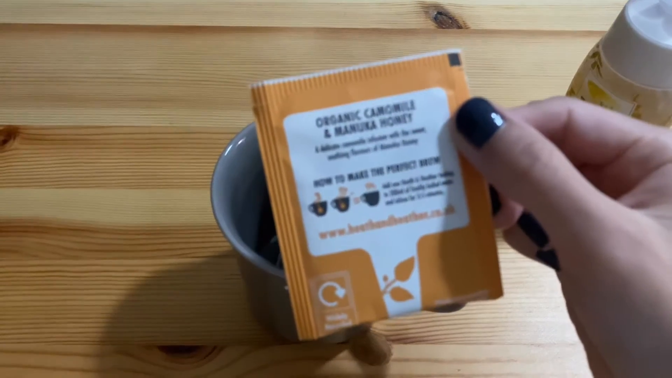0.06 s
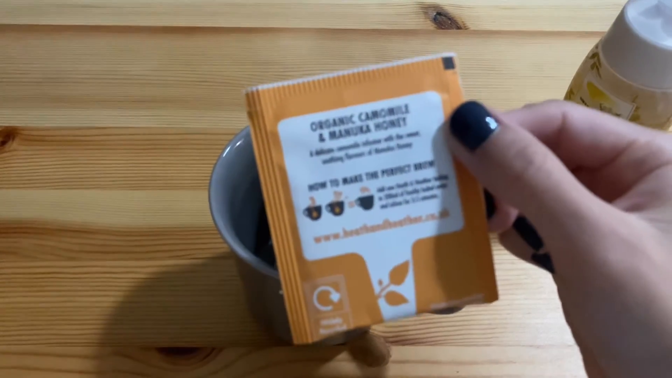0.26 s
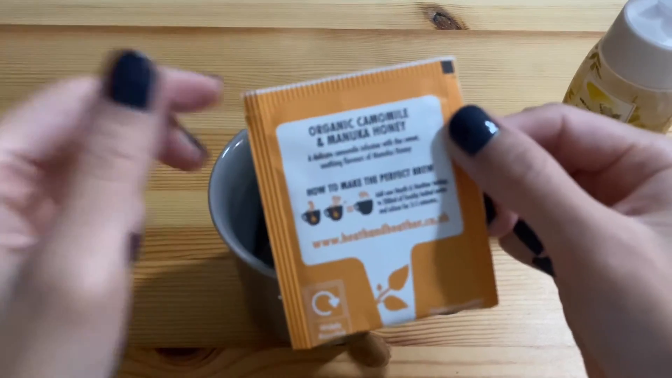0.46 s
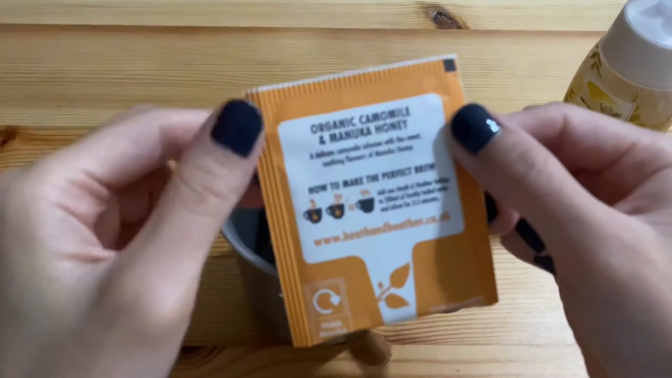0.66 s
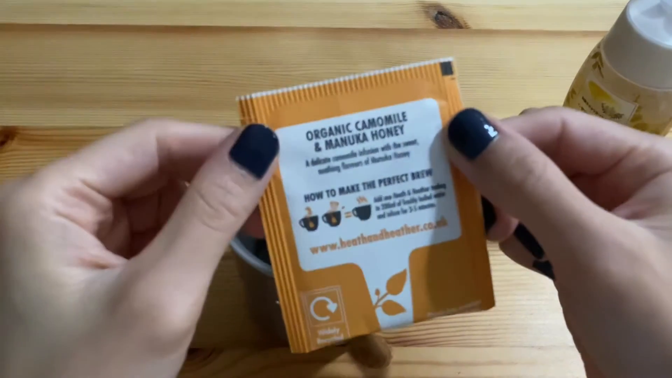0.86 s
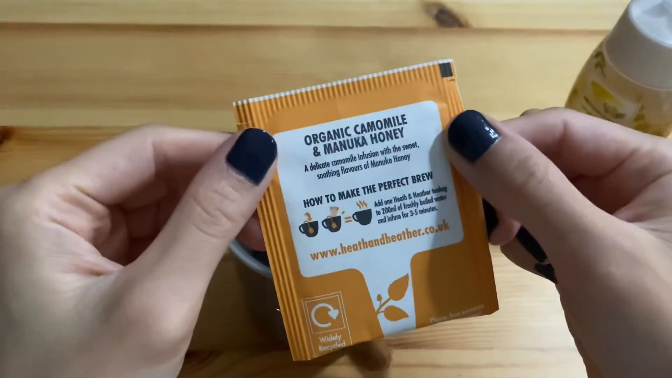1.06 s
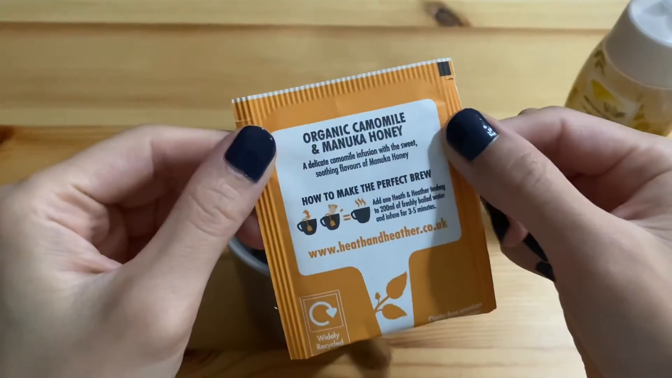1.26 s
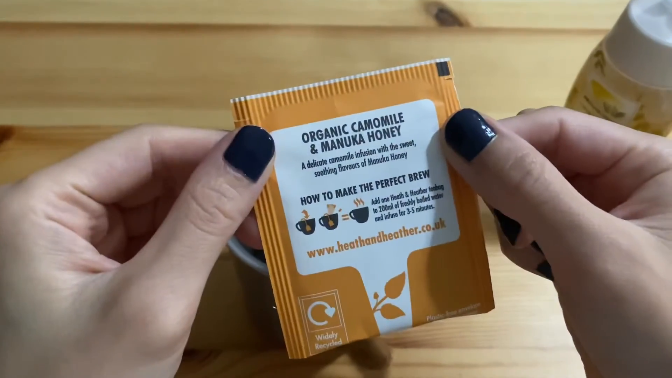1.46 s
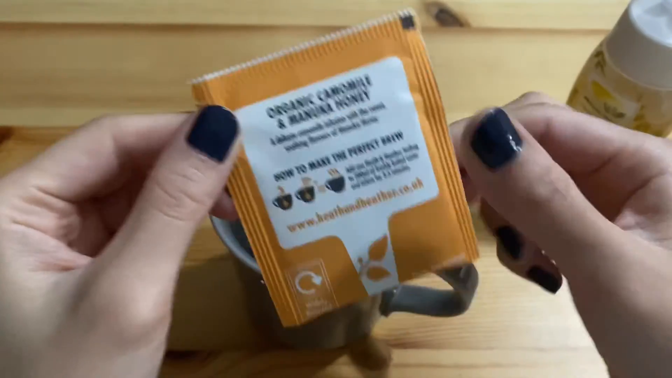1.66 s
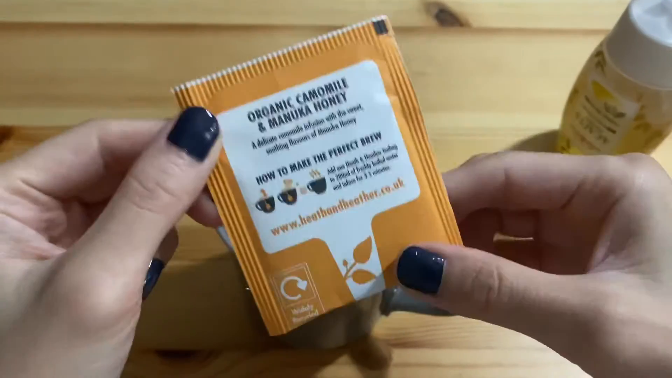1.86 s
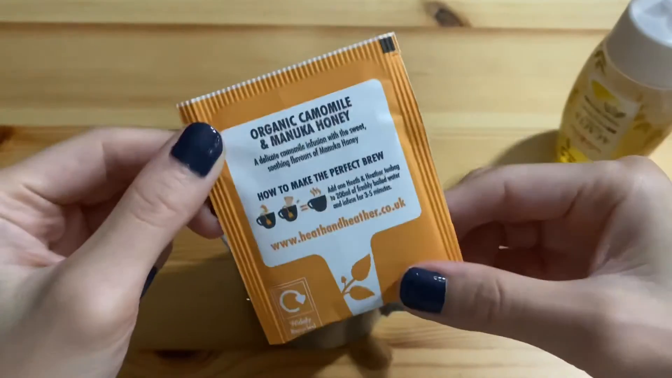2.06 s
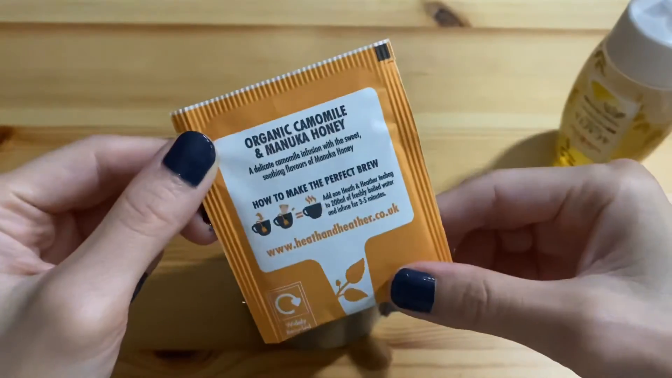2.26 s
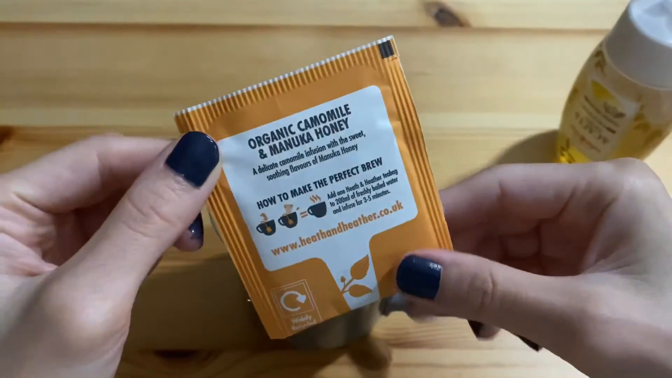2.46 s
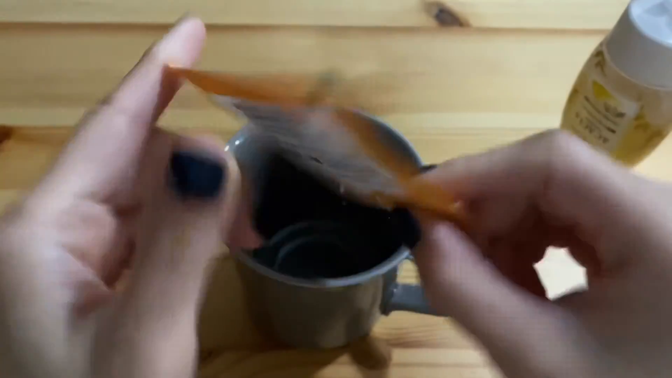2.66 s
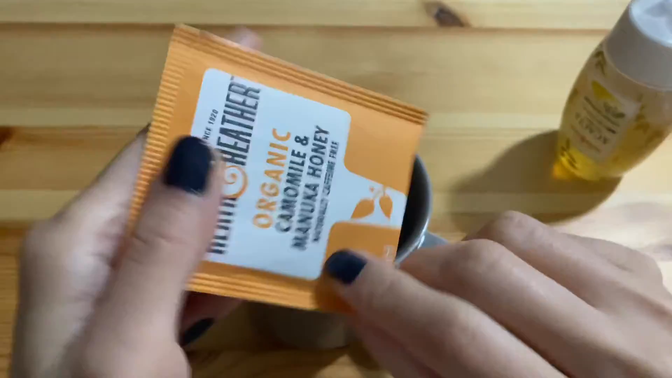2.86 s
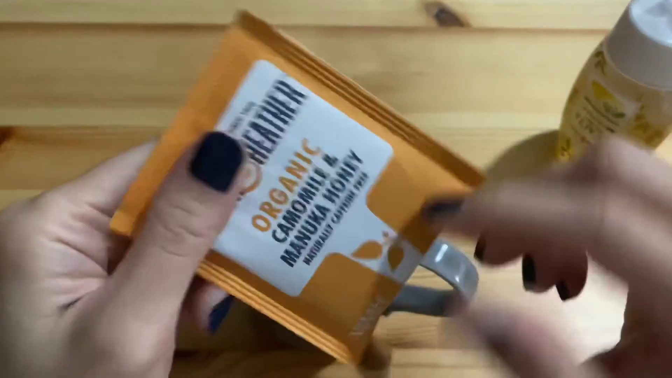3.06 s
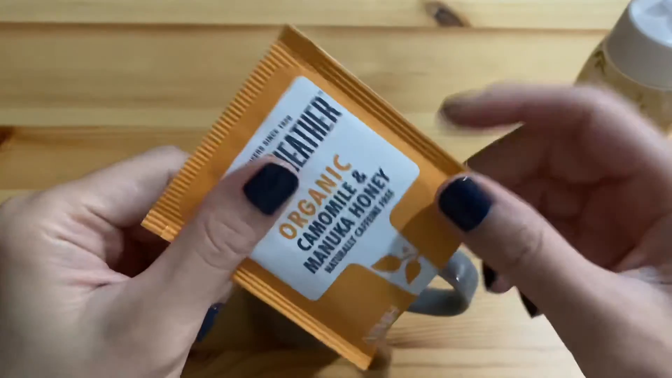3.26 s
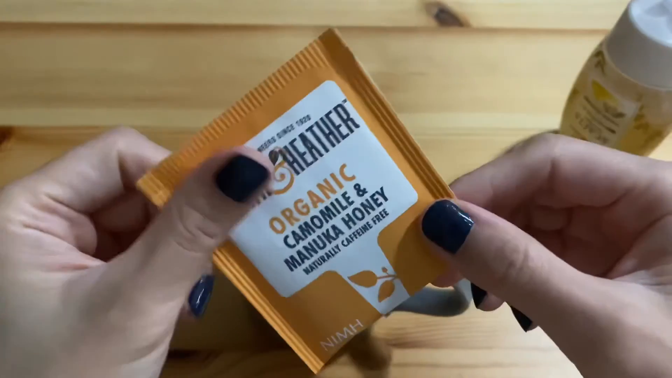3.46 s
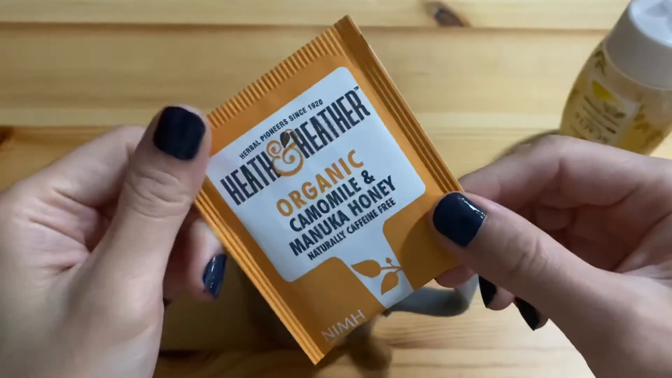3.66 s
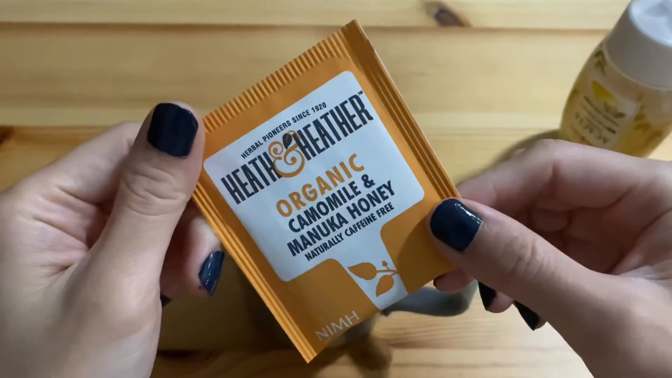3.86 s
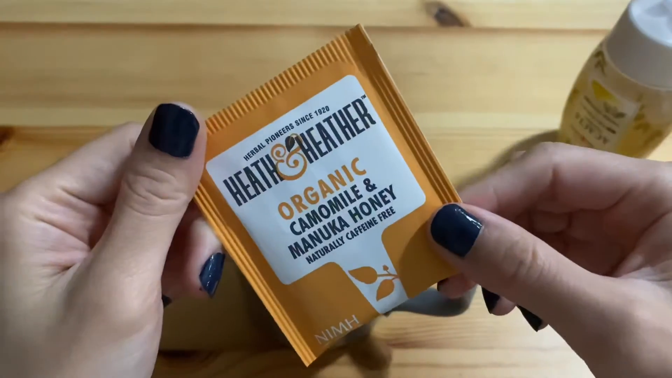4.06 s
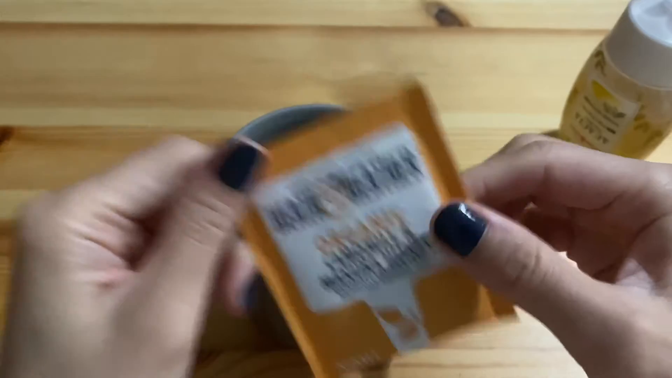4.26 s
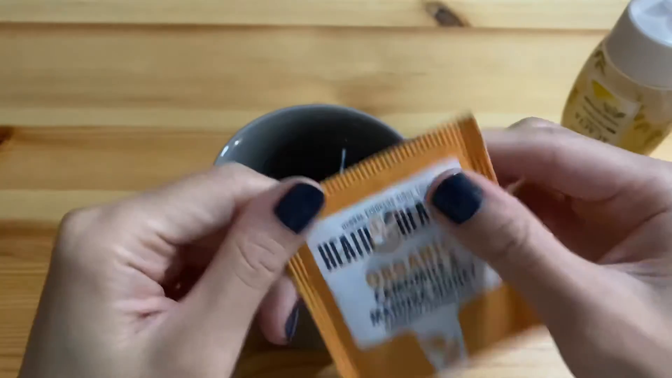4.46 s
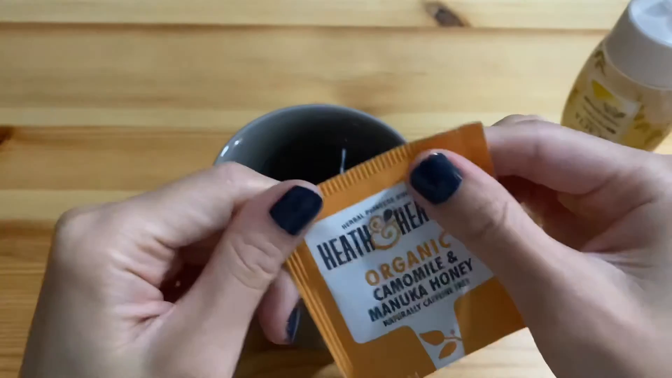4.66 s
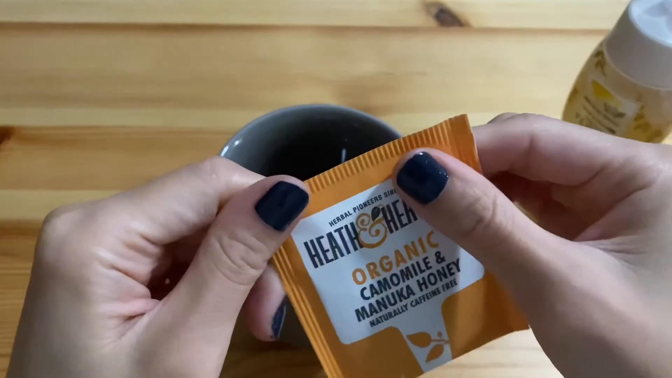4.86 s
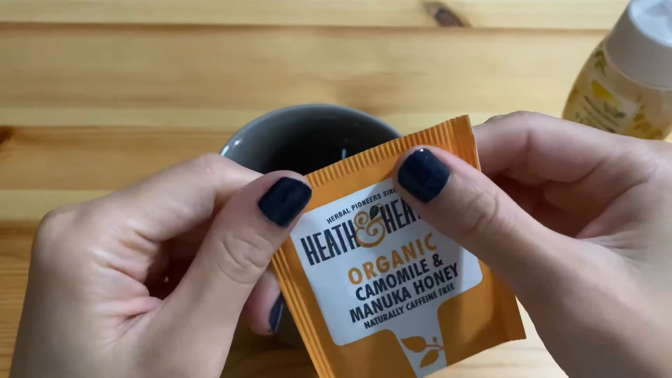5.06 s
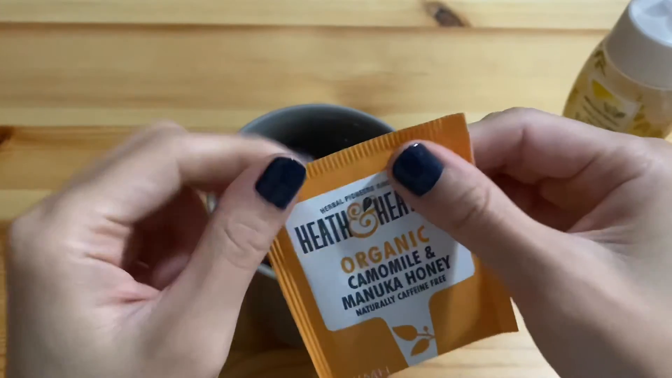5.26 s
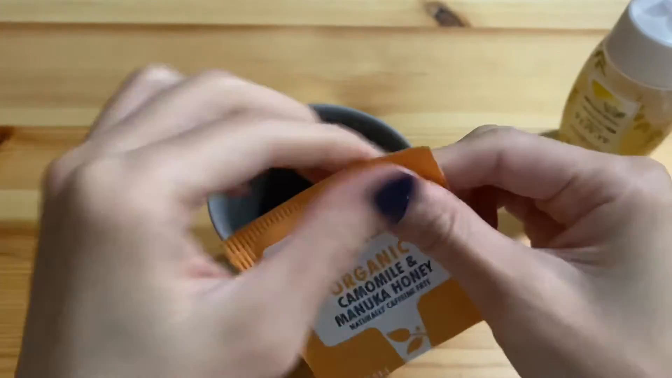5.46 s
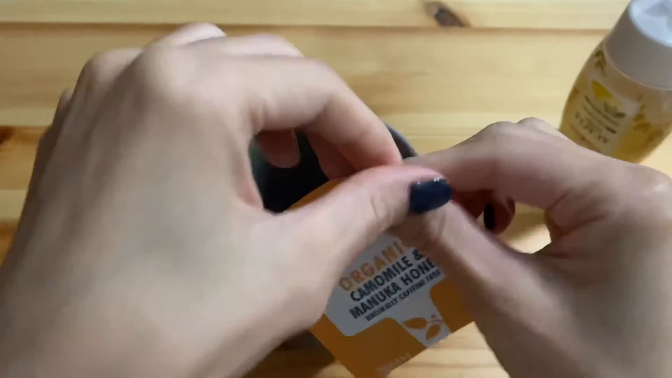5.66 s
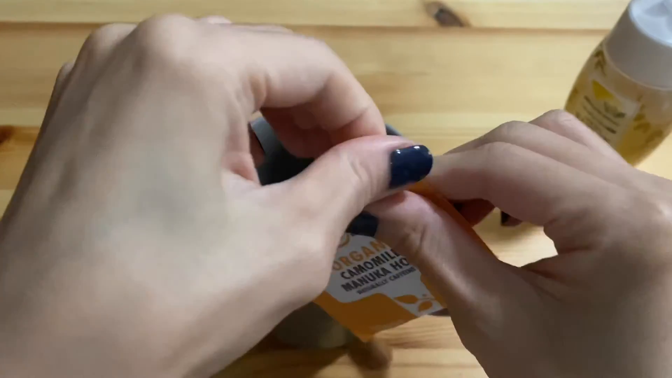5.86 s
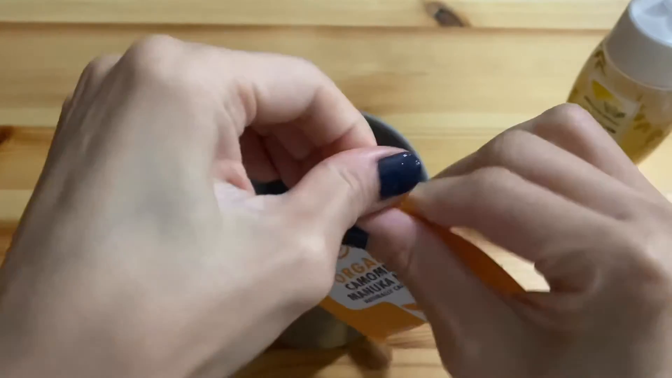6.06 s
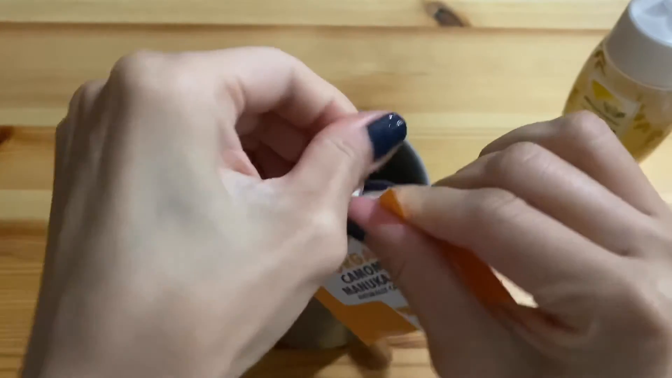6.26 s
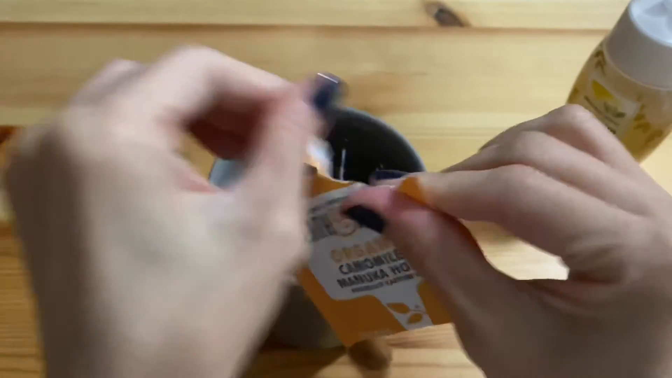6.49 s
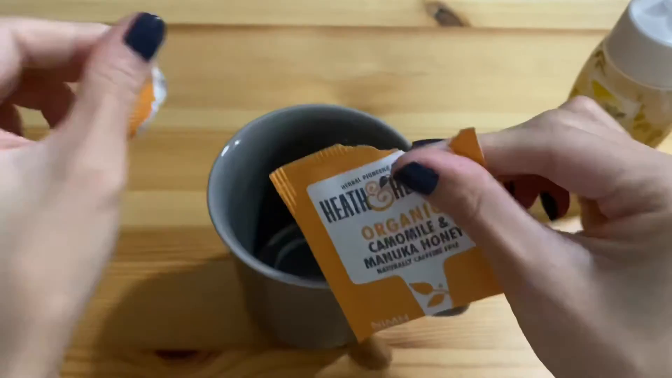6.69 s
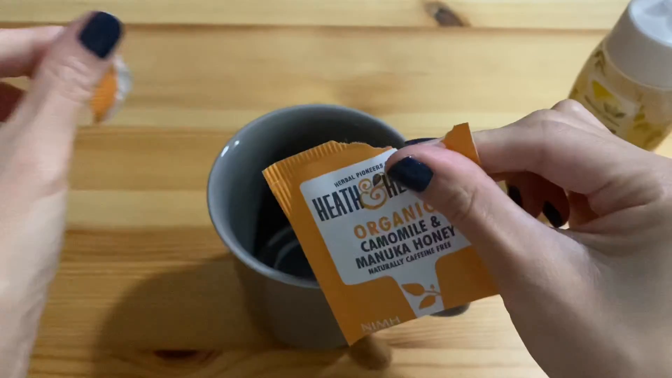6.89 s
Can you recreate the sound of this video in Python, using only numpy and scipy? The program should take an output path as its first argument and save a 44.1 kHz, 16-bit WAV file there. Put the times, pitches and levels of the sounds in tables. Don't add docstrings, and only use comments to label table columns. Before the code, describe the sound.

Close papery snaps, skin rubs and dull table knocks, then a crisp two-part tear of a small sachet over a soft appliance drone.

```python
import sys
import numpy as np
from scipy import signal
from scipy.fft import rfft, irfft, next_fast_len
from scipy.io import wavfile
from scipy.ndimage import uniform_filter1d, map_coordinates

SR = 44100
rng = np.random.default_rng(int(sys.argv[2]) if len(sys.argv) > 2 else 0)


def to_linear_factor(level_db):
    exponent = np.asarray(level_db, float) / 20
    return 10 ** exponent


def store_pcm(level_fs):
    pcm = np.round(np.clip(level_fs, -1, 1) * 32767).astype(np.int16)
    wavfile.write(sys.argv[1], SR, np.atleast_2d(pcm).T)


N = 305613

# frequency in Hz, level in dB.
AIR_SPECTRUM = [(12, -56), (22, -25), (55, 5.5), (104, -5.5), (125, -13.5), (160, -3), (206, -13),
                (340, -18.5), (615, -27.5), (970, -31.5), (1300, -39.5), (2100, -38), (2900, -43.5),
                (13300, -54.5)]
# frequency in Hz, width in Hz, level in dB.
FAN_BANDS = [(104.6, 7.6, 5), (161, 60, 3.5), (483, 13, 7), (611, 7.4, 14.5), (1570, 230, 8.5),
             (2490, 200, 12.5)]
HUM_DB, HUM_SWAY_DB, HUM_SWAYS_PER_S = -56.5, 0.5, 3

# start in seconds, peak in dB, hardness in Hz.
TABLE_BUMPS = [(.412, -60, 300), (.491, -48, 300), (.583, -56, 300), (1.447, -68, 300), (2.569, -47, 600),
               (3.016, -31, 603), (3.052, -32, 396), (3.15, -30, 510), (3.17, -32, 604),
               (3.198, -40.5, 604), (3.302, -37.5, 600), (3.934, -56.5, 305), (4.32, -38, 406.5),
               (6.779, -32, 171), (6.864, -56.5, 125.6), (6.9, -59, 130)]
# frequency in Hz, width in Hz, level in dB.
TABLE_MODES = [(60, 12, 2.5), (116, 160, -3.5), (196, 120, -2.5), (422.3, 240, -8)]

# start in seconds, length in ms,
# fade t60 in ms, hiss in dB, body in dB.
SLIDE_RUNS = [(.635, 39, 1000, -82.5, -81.5), (.765, 25, 37, -77, -71), (1.535, 45, 260, -65, -72),
              (1.575, 68, 120, -68, -72.5), (1.795, 20, 190, -75.5, -78), (1.815, 39, 160, -80, -69),
              (2.322, 25, 200, -83, -79), (2.375, 106, 460, -67.5, -70.5), (2.46, 48, 66, -58.5, -80),
              (2.535, 22, 16, -57.5, -68), (2.575, 20, 100, -63, -64.5), (2.61, 20, 200, -65, -70),
              (2.705, 34, 5600, -57, -56.5), (2.86, 40, 200, -53, -58), (2.925, 40, 400, -49, -56),
              (2.99, 65, 350, -50, -56), (3.085, 72, 80, -54.5, -56), (3.195, 6.5, 13, -61, -56.5),
              (3.21, 86, 610, -65, -71), (3.27, 61, 970, -63, -65), (3.33, 225, 240, -60, -65),
              (3.615, 43, 320, -65.5, -67),
              (4.117, 22, 770, -70.5, -72), (4.156, 50, 68, -56.5, -65.5), (4.294, 21, 150, -64, -68),
                 (4.35, 45, 180, -79, -72.5), (4.406, 3, 290, -49.5, -60), (4.505, 19, 82, -94, -68),
                 (4.64, 55, 210, -66.5, -72), (4.986, 9.4, 185, -68.5, -63.5), (5.163, 45, 150, -60, -68.5),
                 (5.244, 39, 500, -61.5, -70.5), (5.42, 5, 580, -60, -67), (5.51, 36, 23, -58, -94),
                 (5.596, 62, 340, -65, -78), (5.775, 58, 240, -65, -77), (5.807, 9.2, 160, -77, -65.5),
                 (5.92, 150, 220, -76.5, -79)]
# frequency in Hz, level in dB.
SLIDE_HISS = [(2500, -50), (3800, 0.5), (5200, 4.5), (7200, 3), (11000, 0.5), (15000, -1.5), (16600, -14)]
# frequency in Hz, level in dB.
SLIDE_BODY = [(150, -3.5), (400, -0.5), (900, -6.5), (1500, -2.5), (2600, 1.5), (3600, -2), (5000, -20)]

# start in seconds, peak in dB, panel in Hz, low push in dB re peak.
CREASE_SNAPS = [(.779, -59, 2200, -3), (.797, -65, 6700, -3), (.827, -64, 3770, -9), (1.803, -54, 2900, -5),
                (1.949, -66, 1470, -18), (2.507, -42, 4900, -39), (2.615, -52, 3750, -8.5),
                (2.75, -39, 2490, -8), (2.825, -54, 2410, 0), (2.871, -43, 1200, -2),
                (2.877, -40, 4230, -8), (2.892, -23, 5170, -15), (3.014, -44, 7380, -4),
                (3.065, -22.5, 2720, -25), (3.171, -39, 1230, -5), (3.198, -47, 1610, -7),
                (3.037, -24, 4960, -27), (3.302, -40.5, 6900, -4.5), (3.488, -27, 1970, -15.5),
                (4.307, -50, 1610, -18.5), (4.401, -22, 5000, -17), (4.989, -37.5, 1345, -16.5),
                (5.348, -39.5, 2470, -12), (5.418, -11.5, 5650, -39), (5.817, -51.5, 7500, -11),
                (5.935, -60, 7300, -29)]
# start in seconds, peak in dB, panel in Hz, low push in dB re peak.
FOLD_SNAPS = [(.827, -46.5, 1600, -17), (2.569, -50.5, 2530, -6), (2.733, -29.5, 2580, -20),
              (2.834, -25.5, 2800, -9), (2.931, -21, 2900, -13), (3.147, -34, 5920, -20),
              (4.2, -31.5, 2010, -26.5), (4.402, -21, 5530, -41.5), (4.266, -55, 2400, -16),
              (4.317, -50.5, 1640, -9), (4.364, -51, 2300, -7.5), (4.491, -56.5, 2000, -5),
              (5.419, -33.5, 2700, -33.5), (5.667, -39.5, 2430, -12.5)]
# start in seconds, peak in dB, panel in Hz, low push in dB re peak.
PANEL_POPS = [(.809, -51, 1790, -6), (1.003, -44, 1750, -14), (1.003, -41, 800, -42),
              (1.836, -40.5, 2020, -13), (1.836, -46.5, 770, -35), (3.503, -47, 1700, -12),
              (4.402, -38, 1170, -22), (5.419, -36, 1010, -30.5), (5.419, -35, 640, -34.5),
              (6.12, -37, 1640, -25.5), (6.142, -37.5, 860, -27), (4.401, -18, 2480, -40),
              (3.15, -38, 650, -20), (3.037, -30, 2800, -30), (3.488, -36, 1350, -20),
              (3.488, -29, 3200, -30), (5.667, -44, 1650, -20), (6.058, -36, 2200, -20),
              (6.465, -27, 5500, -40), (4.245, -56, 1440, -0.5), (4.522, -32, 1850, -13),
              (5.555, -56, 1700, -2.5)]
# start in seconds, peak in dB, panel in Hz, low push in dB re peak.
SEAL_BREAKS = [(6.058, -29, 6000, -16.5), (6.111, -39.5, 2030, -27), (6.139, -42, 7600, 0),
               (6.154, -46.5, 2120, -13), (6.254, -46.5, 3000, -13), (6.303, -40.5, 1600, -26.5),
               (6.32, -47.5, 2200, -17), (6.431, -43.5, 2400, -15.5), (6.141, -23, 12000, -40),
               (6.147, -27, 14500, -40), (6.155, -24, 14000, -40), (6.171, -24, 12500, -40),
               (6.182, -34, 7220, -25), (6.451, -28.5, 5560, -28), (6.463, -18.5, 5750, -28),
               (6.497, -26.5, 6360, -11), (6.504, -17.5, 6510, -16), (6.55, -27, 1510, -17)]
# start in seconds, peak in dB.
FIBRE_TICKS = [(6.09, -50), (6.169, -41), (6.232, -43), (6.266, -47), (6.299, -34), (6.333, -50.5),
               (6.377, -38.5), (6.395, -40.5), (6.241, -34), (6.253, -32), (6.291, -41), (6.319, -37.5),
               (6.36, -36), (6.37, -31), (6.406, -35), (6.417, -33), (6.431, -30.5)]
TICK_HZ, TICK_LOW_DB = 7300, -47.5

# middle in seconds, slips per second, level in dB, half length in ms.
THUMB_SKIDS = [
    (0.798, 616, -48.5, 4.6),
    (0.832, 960, -63, 3),
    (0.846, 856, -65.5, 5.5),
]
SKID_DB_PER_MS = 4.5

# start in seconds, length in ms, fade t60 in ms, hiss in dB, body in dB.
RIP_RUNS = [(6.06, 11, 1100, -59, -60), (6.108, 5.4, 42, -44.5, -52.5), (6.118, 6.7, 52, -42, -47.5),
            (6.132, 23, 30, -34, -44), (6.151, 8, 74, -42, -49), (6.166, 16, 164, -40, -51),
            (6.197, 40, 74, -48, -59), (6.238, 4.4, 37, -47.5, -58), (6.251, 5, 130, -58, -62),
            (6.28, 14, 54, -54, -59), (6.296, 9, 46, -43, -53), (6.316, 6, 250, -54, -64),
            (6.355, 33, 550, -45, -53.5), (6.447, 9, 130, -32.5, -43), (6.458, 30.7, 203, -25, -34.5),
            (6.49, 65.6, 27, -31.5, -38.5)]
# frequency in Hz, level in dB.
RIP_HISS_SPECTRUM = [(2500, -40), (4000, 0), (5500, 3.5), (7300, 7), (11300, 7), (15000, 10), (16600, -31)]
# frequency in Hz, level in dB.
RIP_BODY_SPECTRUM = [(100, -3), (250, -3), (480, -6), (700, -12), (1150, -8), (1700, 1), (2600, 2.5),
                     (3600, -2), (5000, -42)]

# frequency in Hz, width in Hz, level in dB.
MUG_AIR_MODES = [(865, 40, 0)]
# frequency in Hz, width in Hz, level in dB.
MUG_WALL_MODES = [(1938, 5, -5), (2110, 4, -1)]
# frequency in Hz, width in Hz, level in dB.
POUCH_MODES = [(457, 70, -6.5), (1600, 210, 3.5), (1856, 90, -7), (2616, 160, -3), (3630, 270, -9.5),
               (5450, 570, 2), (6520, 396, -9.5), (7460, 500, 0)]
# frequency in Hz, t60 in seconds.
ROOM_T60 = [(200, 0.69), (1000, 0.2), (3000, 0.28), (8000, 0.14), (15000, 0.17)]

# frequency in Hz, likeness from 0 to 1.
NEAR_LIKENESS = [(100, .96), (450, .93), (900, .9), (2000, .8), (3500, .6), (6000, .8)]
# frequency in Hz, likeness from 0 to 1.
FAR_LIKENESS = [(60, 0.96), (200, 0.8), (500, 0.085), (2000, 0.09), (6000, 0.39)]
# frequency in Hz, level in dB.
NEAR_RIGHT_DB = [(60, -3.5), (250, -6.5), (1000, -10), (2500, -4), (4500, -6.5), (6500, -7)]
# frequency in Hz, level in dB.
FAR_RIGHT_LEVEL_DB = [(60, -1.8), (200, -3.5), (800, 1), (2500, -4.5), (6500, -0.5)]
# frequency in Hz, phase in rad.
RIGHT_PHASE_RAD = [(100, 0), (1000, -.7), (2300, -1.5), (3200, -1), (3900, .1), (6500, 0)]


def unit(x):
    return x / np.sqrt(np.mean(x ** 2) + 1e-20)


def along(points, hz):
    f, v = np.transpose(points)
    return np.interp(np.log(hz + 1), np.log(f + 1), v)


def wobble(knots_per_s):
    knots = rng.standard_normal(int(N * knots_per_s / SR) + 4)
    return map_coordinates(knots, [np.arange(N) * knots_per_s / SR])


def filtered(x, response):
    m = next_fast_len(x.shape[-1] + SR // 2)
    return irfft(rfft(x, m) * response(np.fft.rfftfreq(m, 1 / SR)), m)[..., :x.shape[-1]]


def coloured(x, spectrum):
    return unit(filtered(x, lambda f: to_linear_factor(along(spectrum, f))))


def mode(f, hz, width_hz):
    return 1j * f * width_hz / (hz * hz - f * f + 1j * f * width_hz)


def modes(table):
    return lambda f: sum((-1) ** k * to_linear_factor(db) * mode(f, hz, width_hz)
                         for k, (hz, width_hz, db) in enumerate(table))


def patchy(grain, patchy_db):
    z = signal.stft(grain * rng.standard_normal((2, N)), nperseg=256)[2]
    field = uniform_filter1d(rng.standard_normal(z.shape[1:]), size=5, axis=0)
    field = uniform_filter1d(field, size=8, axis=1)
    return signal.istft(z * to_linear_factor(patchy_db * unit(field)), nperseg=256)[1][:, :N]


def background():
    def bands(f):
        fans_db = sum(db * np.exp(-((f - hz) / width_hz) ** 2) for hz, width_hz, db in FAN_BANDS)
        return to_linear_factor(along(AIR_SPECTRUM, f) + fans_db) * (f < 13400)

    air = unit(filtered(patchy(1, patchy_db=1.07), bands))
    return to_linear_factor(HUM_DB + HUM_SWAY_DB * wobble(HUM_SWAYS_PER_S)) * air


def bumps():
    force, t = np.zeros(N + SR), np.arange(2048) / SR
    for s, db, hard_hz in TABLE_BUMPS:
        u = 2 * np.pi * hard_hz * t
        force[round(s * SR):][:len(t)] += to_linear_factor(db + 18) * hard_hz / 500 * u * np.exp(-u)
    return filtered(force[:N], modes(TABLE_MODES))


def runs(rows, swell):
    power, ms = np.zeros((2, N + SR)), np.arange(SR // 2) / SR * 1000
    for s, length_ms, fade_ms, *levels_db in rows:
        swell_db = -20 * np.clip(1 - ms / (swell * length_ms), 0, 1)
        fade_db = -60 * np.clip(ms - length_ms, 0, None) / fade_ms
        power[:, round(s * SR):][:, :len(ms)] += to_linear_factor(np.add.outer(levels_db, swell_db + fade_db)) ** 2
    return np.sqrt(power[:, :N])


def friction(gain, bright, body, slow_db, fast_db, patchy_db):
    clumps = to_linear_factor(slow_db * wobble(120) + fast_db * wobble(700))
    slips = patchy(clumps, patchy_db)
    return gain[0] * coloured(slips, bright) + gain[1] * coloured(slips, body)


def sliding():
    gain = runs(SLIDE_RUNS, swell=0.4)
    return to_linear_factor(2.5) * friction(gain, SLIDE_HISS, SLIDE_BODY, slow_db=1.4, fast_db=2.2, patchy_db=2.2)


def snaps(rows, crisp_db, rattle_ms, wide=0.3):
    out, t = np.zeros((2, N + SR)), np.arange(1024) / SR
    f = np.fft.rfftfreq(len(t), 1 / SR)
    life_s = rattle_ms / 1000 * np.array([1.5, 1.5, 1.1])[:, None, None]
    low = mode(f, 812, 470) * mode(f, 410, 3200)
    crisp = (mode(f, 4200, 2600) + 0.7 * mode(f, 8000, 11000)) * mode(f, 5800, 10000)
    for s, db, hz, low_db in rows:
        rattle = rng.standard_normal((3, 2, len(t))) * (1 - np.exp(-t / 0.00014)) * np.exp(-t / life_s)
        push = rfft(rattle)
        push = push / np.sqrt(uniform_filter1d(np.abs(push) ** 2, size=9))
        panel = mode(f, hz, wide * hz) * mode(f, hz, 9 * wide * hz)
        parts = irfft(push * np.array([panel, low, crisp])[:, None]) * to_linear_factor(-60 * t / 0.098)
        parts = parts / np.abs(parts).max(axis=2, keepdims=True)
        gains = to_linear_factor(db + np.array([1.5, low_db + 9.5, crisp_db + 7]))
        out[:, round((s + 0.0006) * SR):][:, :len(t)] += np.tensordot(gains, parts, axes=1)
    return out[:, :N]


def buckling():
    ticks = [(s, db, TICK_HZ, TICK_LOW_DB) for s, db in FIBRE_TICKS]
    return (snaps(CREASE_SNAPS, crisp_db=-6.5, rattle_ms=0.76)
            + snaps(FOLD_SNAPS, crisp_db=-27, rattle_ms=1)
            + snaps(PANEL_POPS, crisp_db=-50, rattle_ms=0.9, wide=0.18)
            + snaps(SEAL_BREAKS, crisp_db=-7.5, rattle_ms=0.9)
            + snaps(ticks, crisp_db=-13, rattle_ms=1))


def squeak():
    s, slips_per_s, db, half_ms = np.transpose(THUMB_SKIDS)
    t = np.arange(N) / SR
    turns = np.cumsum(np.interp(t, s, slips_per_s) * (1 + 0.032 * wobble(300))) / SR
    slips = np.diff(np.floor(turns), prepend=0)
    paper = modes([(660, 360, 0), (1780, 260, 7), (3780, 230, -6), (6850, 950, -8.5)])
    outside_ms = np.clip(1000 * np.abs(t - s[:, None]) - half_ms[:, None], 0, None)
    level_db = np.max(db[:, None] - SKID_DB_PER_MS * outside_ms, axis=0)
    return to_linear_factor(level_db) * unit(filtered(slips, paper))


def ripping():
    gain = runs(RIP_RUNS, swell=0.37)
    return friction(gain, RIP_HISS_SPECTRUM, RIP_BODY_SPECTRUM, slow_db=1.6, fast_db=2.4, patchy_db=3)


def room(x):
    hz, t, z = signal.stft(rng.standard_normal((2, SR // 2)), SR, nperseg=256)
    decay = to_linear_factor(-60 * t / along(ROOM_T60, hz)[:, None])
    tail = signal.istft(z * decay, SR, nperseg=256)[1]
    tail = np.pad(tail / np.linalg.norm(tail[0]), ((0, 0), (170, 0)))
    return signal.fftconvolve(x[None], tail, axes=1)[:, :N]


def ports(pair, alike, right_db, phase_share):
    def response(f):
        share = np.clip(along(alike, f), 0, 1)
        late = share * np.exp(1j * phase_share * along(RIGHT_PHASE_RAD, f))
        return to_linear_factor(along(right_db, f)) * np.array([late, np.sqrt(1 - share ** 2)])

    return np.array([pair[0], filtered(pair, response).sum(axis=0)])


def scene():
    hum = background()
    table = bumps()
    column, wall, pouch = modes(MUG_AIR_MODES), modes(MUG_WALL_MODES), modes(POUCH_MODES)
    handling = filtered(sliding() + buckling() + squeak(), lambda f: 1 + 0.6 * column(f))
    rip = filtered(ripping(), lambda f: 1 + 2.2 * pouch(f) + to_linear_factor(19) * column(f) + to_linear_factor(4.5) * wall(f))
    near = handling + rip + table
    far = to_linear_factor(-14.5) * room(near[0]) + hum
    return (ports(near, NEAR_LIKENESS, NEAR_RIGHT_DB, phase_share=0.94)
            + ports(far, FAR_LIKENESS, FAR_RIGHT_LEVEL_DB, phase_share=0.21))


def band_limit(x):
    return signal.sosfilt(signal.butter(12, 17020, fs=SR, output="sos"), x)


def record(dry):
    def high(f):
        return np.clip((f - 6000) / 700, 0, 1)

    def spreading(f):
        edge = to_linear_factor(-30 * np.clip((f - 15900) / 700, 0, 2))
        turn = 2 * np.pi * (np.minimum(f, 15300) - 6950) / 4170
        twist = (turn - 0.44 * np.sin(2 * turn)) / 2
        return edge * high(f) * np.exp(1j * np.outer([-1, 1], twist))

    spread = filtered(dry[0], spreading)
    mix = spread + filtered(dry, lambda f: 1 - high(f))
    return band_limit(mix)


dry = scene()
out = record(dry)
store_pcm(out)
```